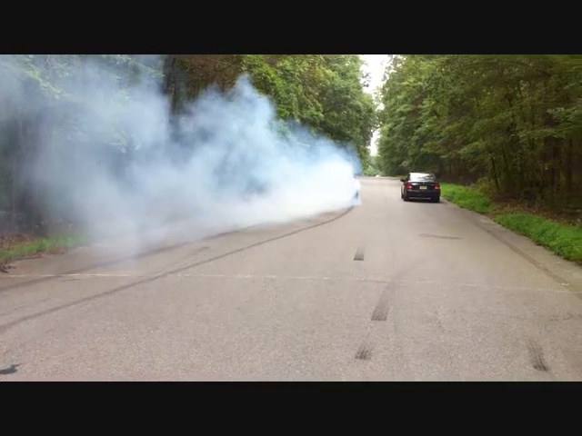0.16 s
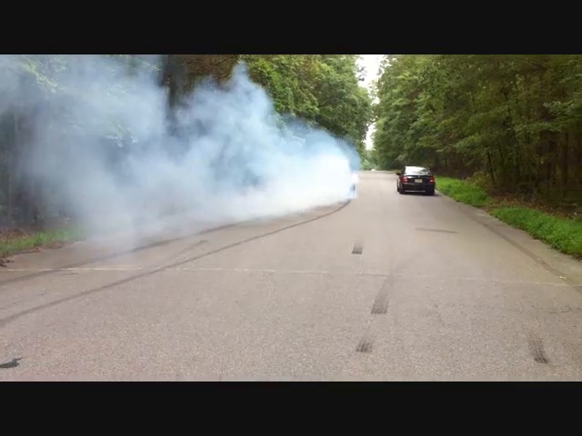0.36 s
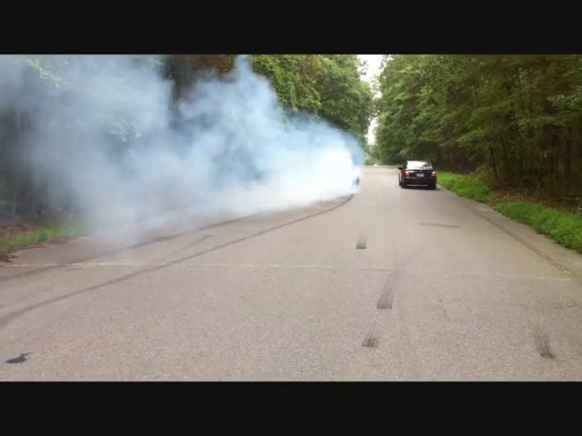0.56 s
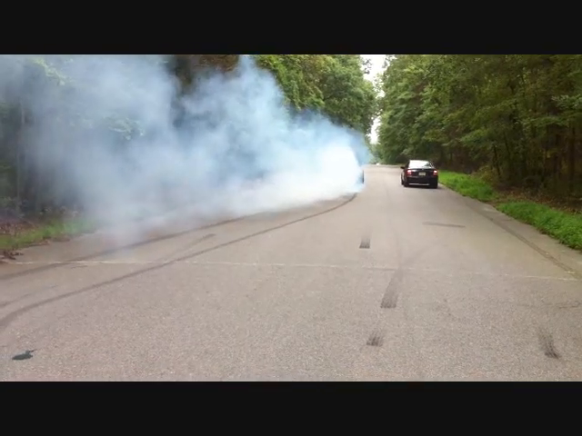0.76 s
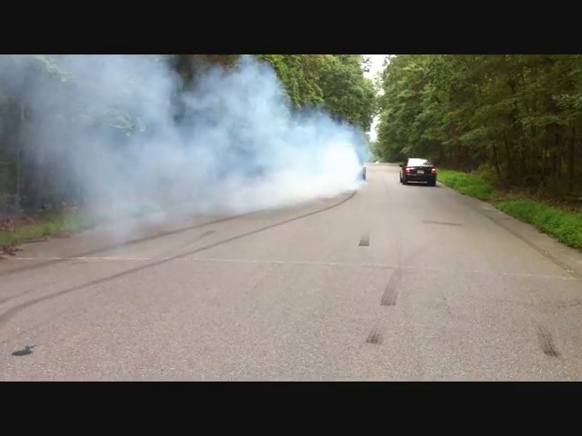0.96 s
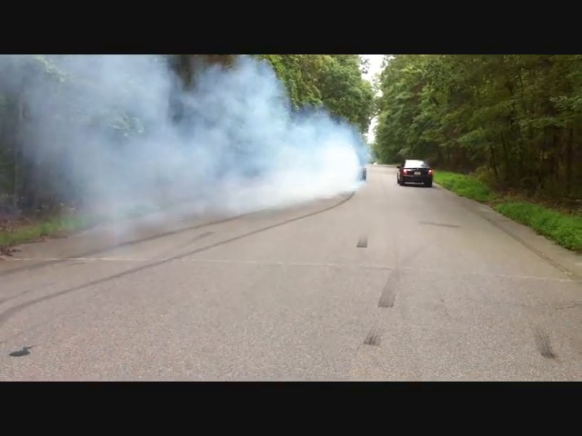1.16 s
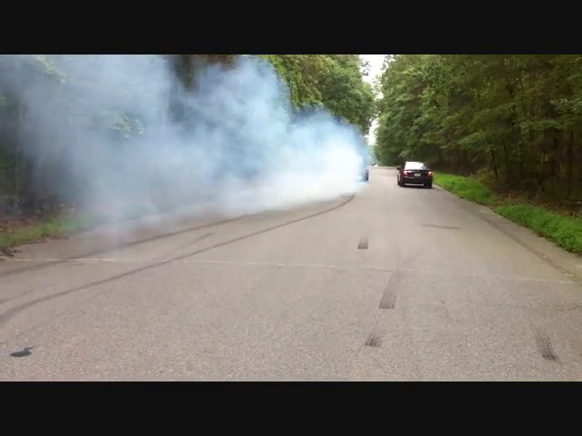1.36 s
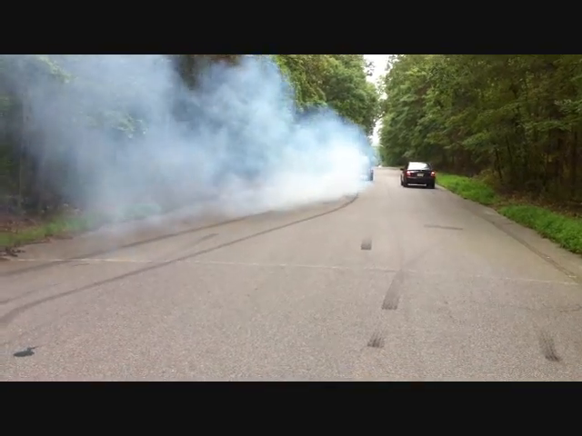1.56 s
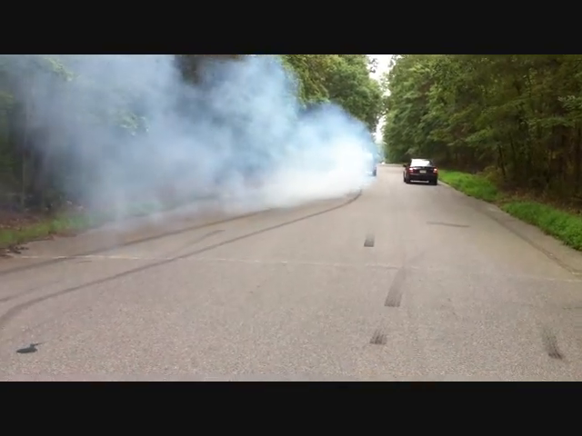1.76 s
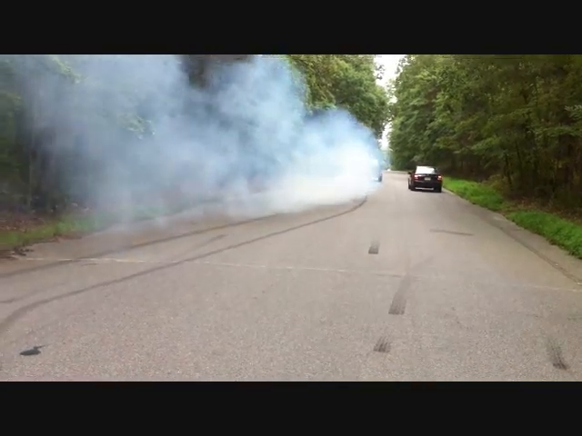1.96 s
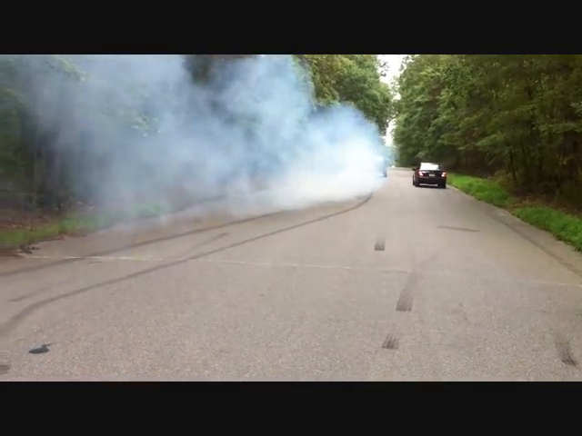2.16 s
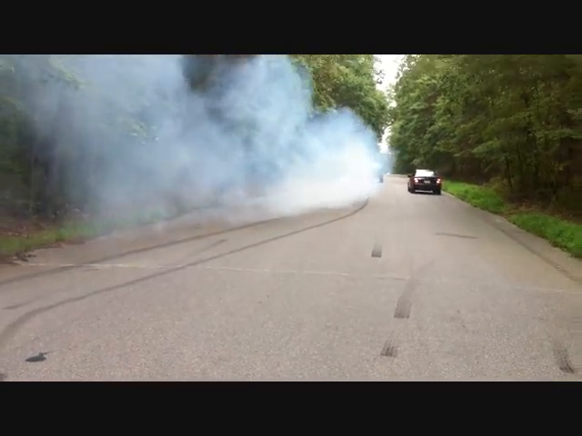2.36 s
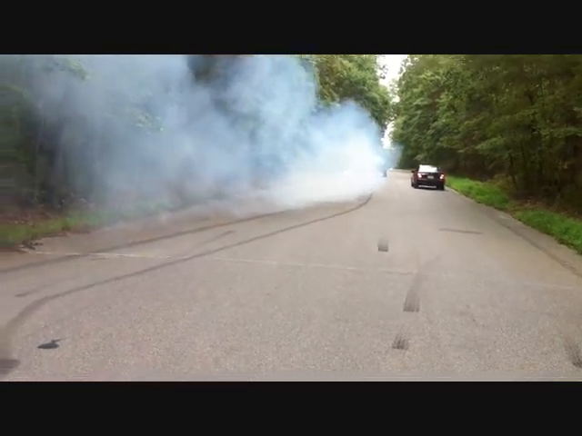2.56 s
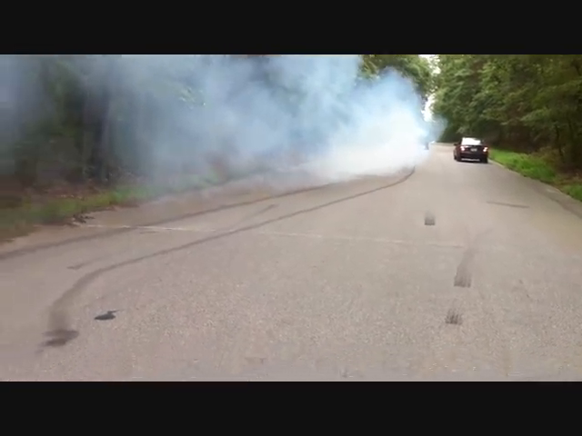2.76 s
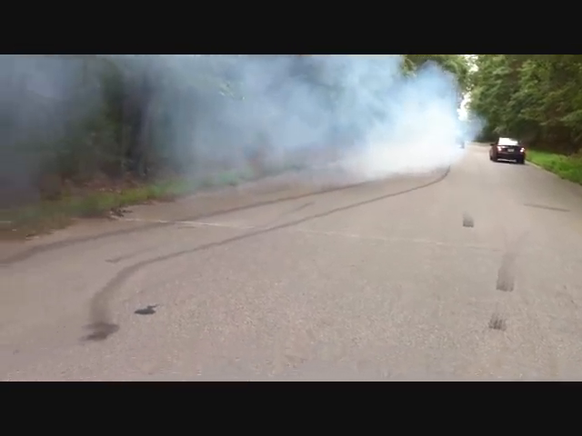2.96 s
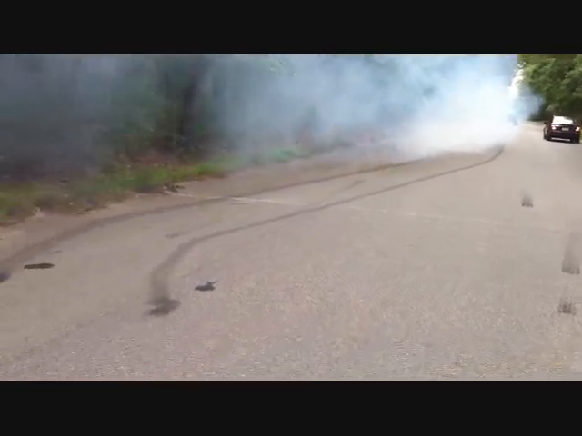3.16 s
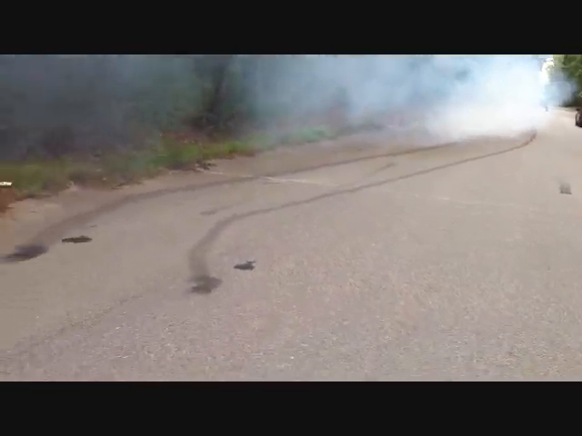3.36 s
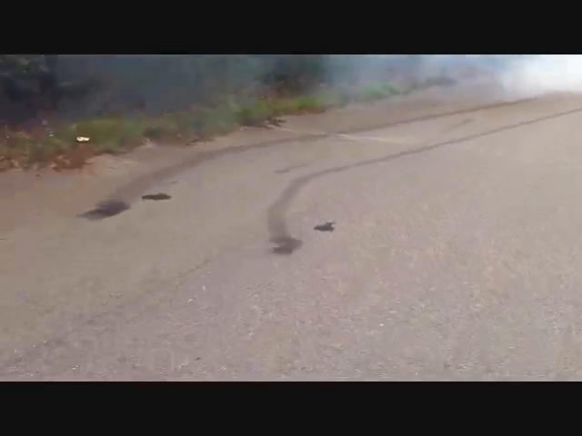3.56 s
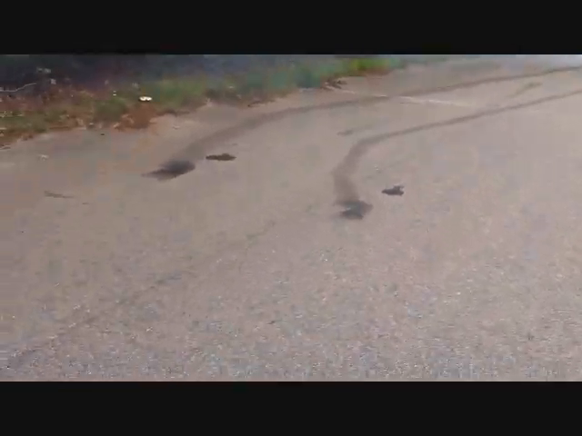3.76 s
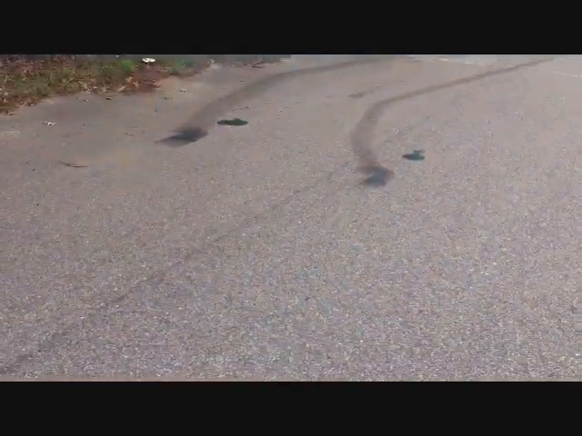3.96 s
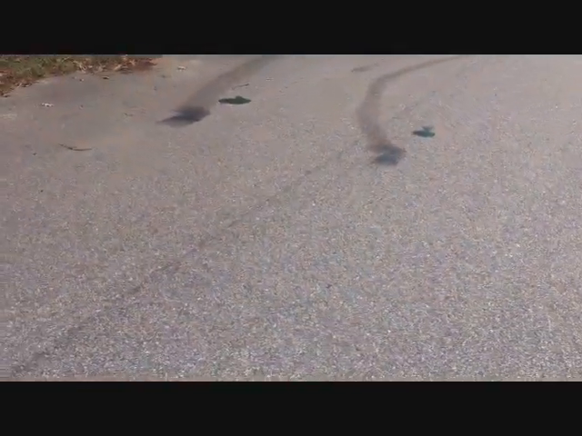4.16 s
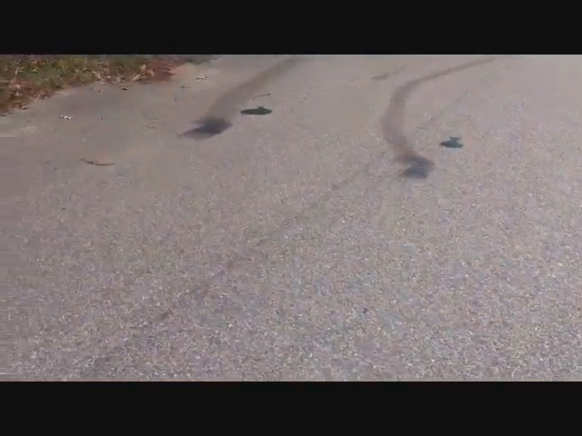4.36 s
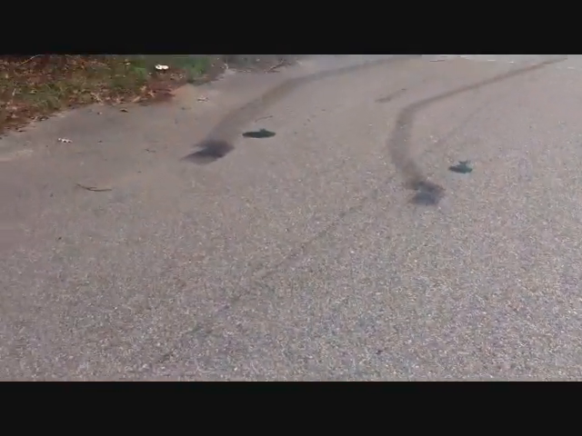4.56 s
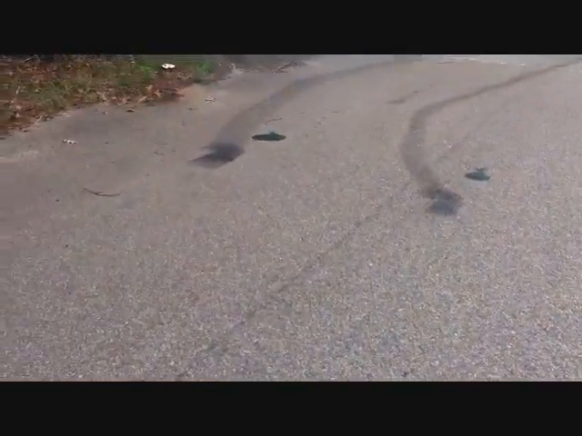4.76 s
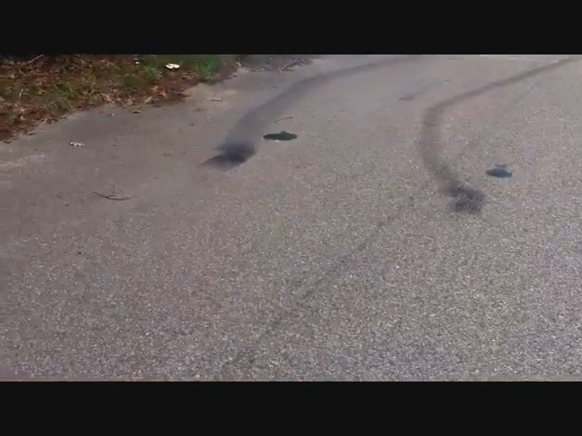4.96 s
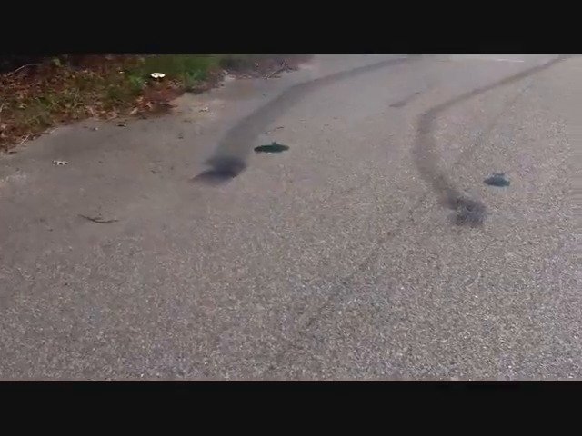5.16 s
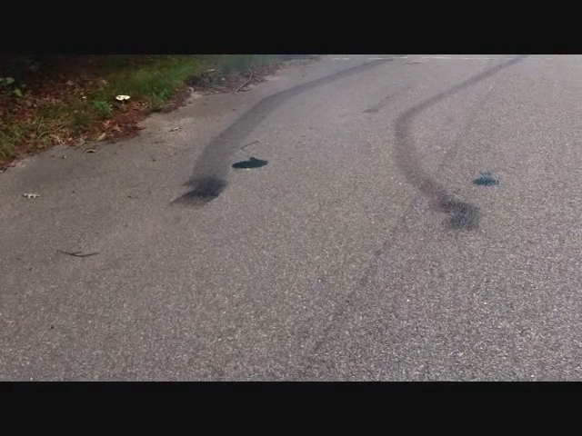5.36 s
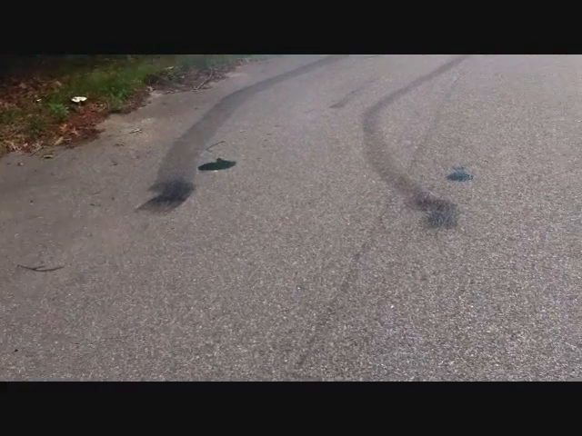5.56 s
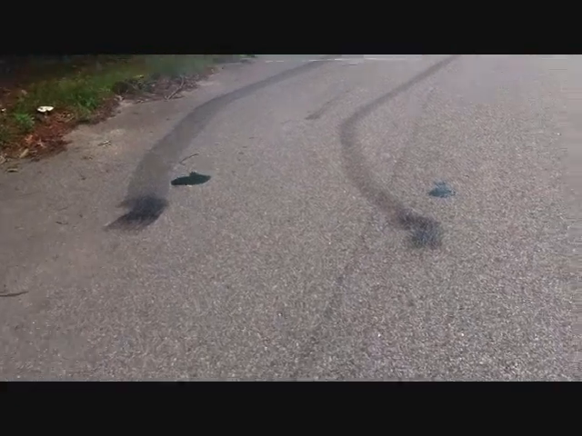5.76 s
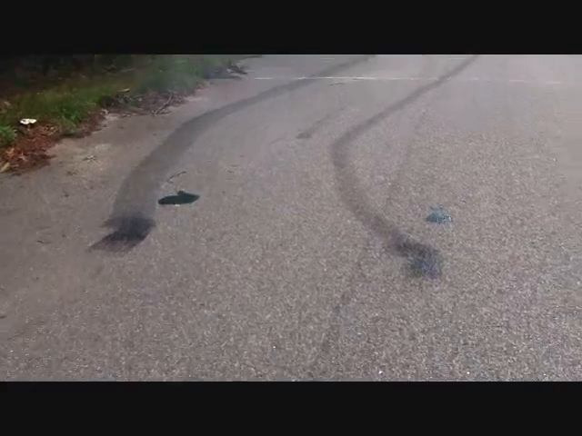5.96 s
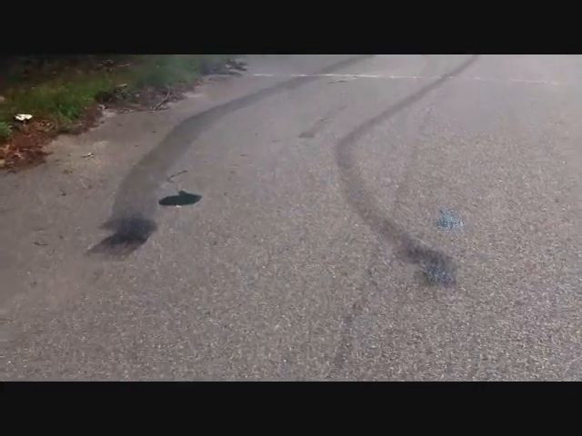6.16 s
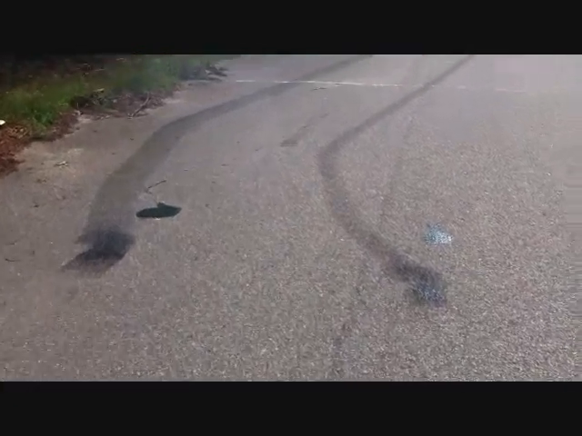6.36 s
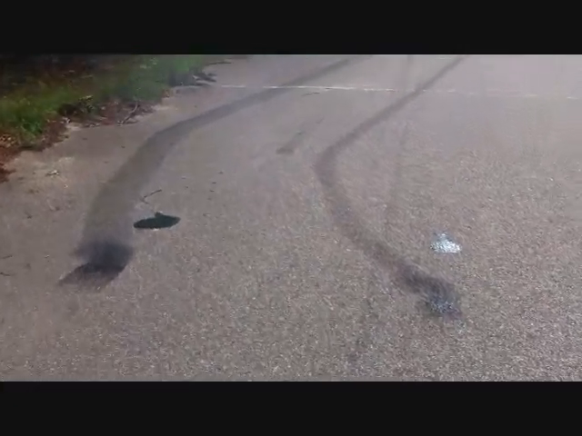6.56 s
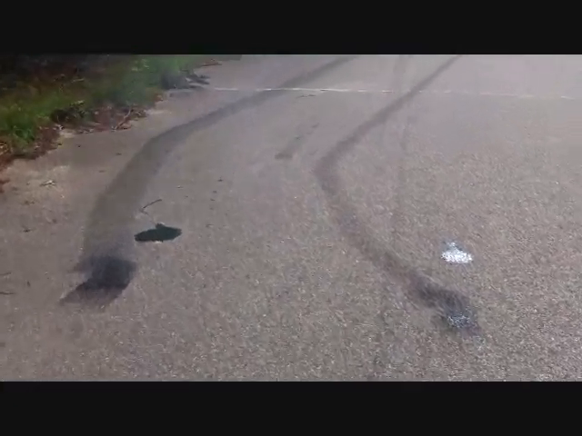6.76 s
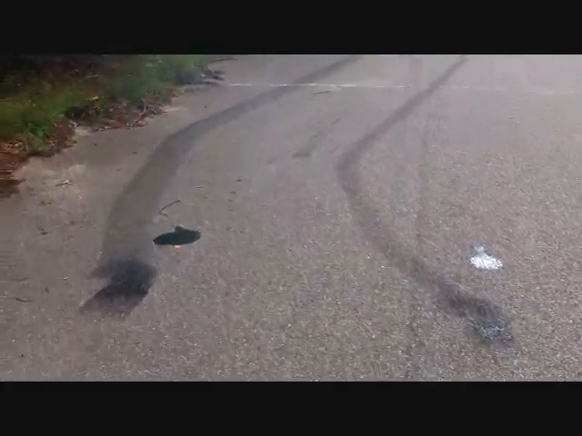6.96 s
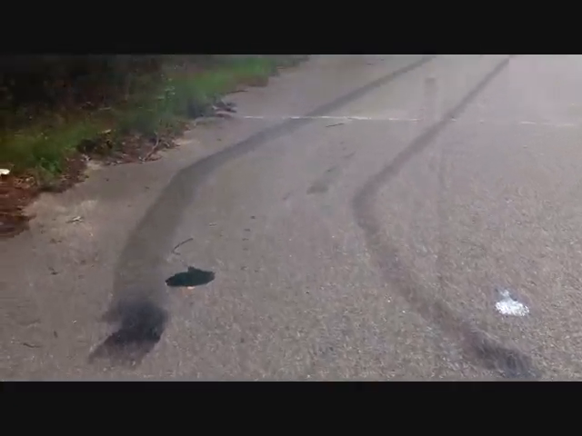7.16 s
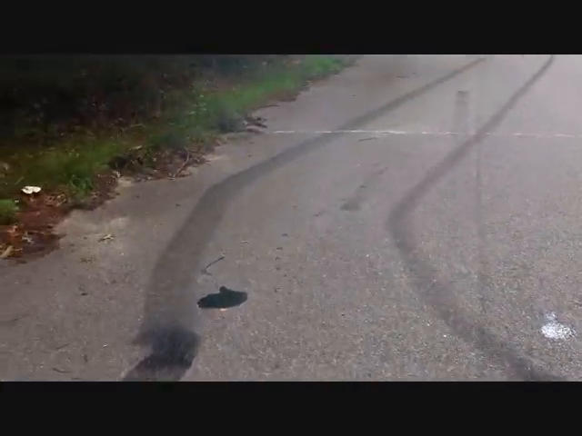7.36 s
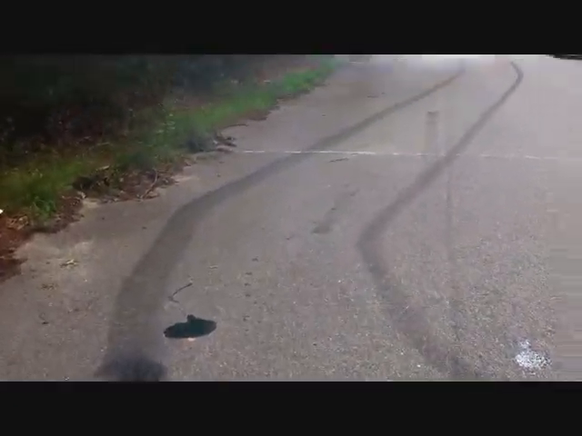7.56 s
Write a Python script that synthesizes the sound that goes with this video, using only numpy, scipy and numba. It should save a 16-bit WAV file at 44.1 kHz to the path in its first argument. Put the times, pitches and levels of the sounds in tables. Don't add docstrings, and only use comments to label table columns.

```python
import sys
import numpy as np
from scipy import signal
from scipy.fft import rfft, irfft, next_fast_len
from scipy.io import wavfile
from scipy.ndimage import uniform_filter1d
from numba import njit

SR = 44100
rng = np.random.default_rng(int(sys.argv[2]) if len(sys.argv) > 2 else 0)


def file_out(sig):
    cols = np.atleast_2d(sig).T
    lim = np.clip(cols, -1, 1)
    pcm = np.round(lim * 32767).astype(np.int16)
    wavfile.write(sys.argv[1], SR, pcm)


def boost(x):
    u = np.asarray(x, float) / 20
    return 10 ** u


N = 339570
T = np.arange(N) / SR

# time in seconds, cycle rate in Hz, effort in dB, lope in dB added to lines under
# the firing rate, bark in dB added to the top lines.
PULL = [
    (0, 40.3, -32, 1, 2),
    (.7, 38.2, -36, 2, 5),
    (1, 36.7, -31, -3, 0),
    (1.4, 34.7, -31, 2.5, -8),
    (1.78, 31.92, -24, -8, -1),
    (2.06, 34.4, -28.5, -5, -4),
    (2.37, 35.05, -29.5, -24, -6),
    (2.63, 36.71, -27.5, -22, 1),
    (2.75, 35.85, -29.5, -14, 1),
]
# time in seconds, level in dB, bark in dB added to the top lines.
COAST = [(2.75, -33, 0), (2.79, -31, 0), (2.82, -27, 3), (2.92, -26, 5), (2.98, -27, 2), (3.04, -27.5, -3),
         (3.15, -27, -5), (3.33, -26.5, -2), (3.6, -28, 0), (3.8, -29, -4), (4.04, -32, -9),
         (4.3, -33, -12), (4.6, -29, -14), (4.9, -26, -16), (5.1, -38, -20)]
# time in seconds, cycle rate in Hz.
COAST_RATE = [(2.75, 36.3), (2.79, 35), (2.83, 33.6), (2.92, 33.4), (3, 31.5), (3.26, 28.2), (3.59, 23.5),
              (3.76, 21.3), (4.21, 16.3), (4.72, 11.7), (5.1, 8.6)]
# multiple of the cycle rate, level in dB.
PULL_LINES = [(3, -7), (4, -8.5), (5, -18), (6, -4.5), (7, -33.5), (8, -10.5), (10, -21), (12, -20),
              (15, -32), (16, -23), (18, -16), (24, -39), (30, -33)]
COAST_LINES = [(5, -17), (6, -1), (7, -24), (9, -13.5), (12, -10.5), (15, -23), (18, -16.5), (24, -26)]
# frequency in Hz, gain in dB.
PULL_PIPE = [(60, -65), (105, -35), (150, 2), (190, -1.5), (240, -9), (345, -9.5), (480, 2.5), (640, 9.5),
             (780, 9.5)]
COAST_PIPE = [(70, -58.5), (105, -17.5), (130, -11), (160, 3), (200, 1.5), (250, -8), (300, -24), (400, -9),
              (560, 3.5), (800, -4)]
# start in seconds, thump in dB, crack in dB, crack centre in Hz.
POPS = [
    (2.549, -60, -29.5, 1500),
    (2.547, -60, -30.5, 407),
    (2.815, -36, -49, 900),
    (2.939, -20.5, -42, 4420),
    (2.945, -60, -32, 650),
    (3.016, -33, -36, 620),
]

# start in seconds, peak in dB, pitch in Hz.
TREAD_SLIPS = [(.003, -5.5, 970), (0.013, -3, 960), (0.053, -2, 925), (.072, -33, 1010), (0.359, -8.5, 910),
               (0.042, -13, 990), (0.09, -9, 970), (0.154, -3.5, 915), (0.193, -3, 1060), (0.225, -15, 1050),
         (0.245, -3, 960), (0.268, -5.5, 940), (0.312, -2, 930), (0.342, -3.5, 950), (0.402, -8, 880),
         (0.427, -8.5, 1040), (0.448, -16, 946), (0.473, -6.5, 880), (0.495, -7, 926), (0.532, -9, 914),
         (0.565, -8, 918), (0.577, -6.5, 930), (0.618, -12, 870), (0.642, -9, 830), (0.659, -6, 940),
         (0.684, -11.5, 945), (0.709, -13, 947), (0.729, -11, 953), (0.767, -9, 880), (0.786, -11, 900),
         (0.845, -10.5, 934), (0.877, -13.5, 986), (0.897, -27, 937), (0.938, -12.5, 824),
         (0.996, -19, 951), (1.02, -10, 800), (1.039, -15, 900), (1.086, -15, 1030), (1.108, -21, 920),
         (1.139, -28, 810), (1.184, -24, 982), (1.206, -21, 810), (1.243, -25, 950), (1.326, -23, 991),
         (1.342, -24, 905)]
# time in seconds, main pitch in Hz, upper pitch in Hz.
ROWS = [(0, 947.2, 1026), (.2, 942.4, 1075), (.35, 934, 1076), (.5, 917, 1044), (.6, 933.7, 1044),
        (.7, 960.4, 1034), (.85, 922, 1045), (1, 936, 1013), (1.1, 930, 1004), (1.5, 920, 980)]
# peak time in seconds, peak in dB, pitch in Hz.
SHRIEKS = [(0.0149, -19, 1836), (0.0572, -8.5, 1818), (0.1221, -17, 1610), (0.1544, -18, 1850),
           (0.2099, -18, 1850), (0.2674, -17, 1880), (0.314, -14, 1810), (0.3721, -20, 1840),
           (0.4773, -29, 1900), (0.5094, -16, 1880), (0.5894, -18, 1830), (0.6744, -20, 1850)]
# time in seconds, level in dB.
SPIN = [
    (0, -33),
    (1.07, -35),
    (2.17, -39),
    (2.62, -44),
    (2.76, -51),
    (3.42, -58),
    (4.4, -63),
]
# frequency in Hz, density in dB per Hz.
HISS = [(1650, -5.5), (2800, -5), (5180, -2), (6200, 0.5), (7410, -3.5), (8680, -4), (11600, -12),
        (13700, -21), (15500, -26)]

# time in seconds, level in dB.
ROLL = [(0, -20.5), (.12, -23), (.4, -22), (.9, -25.5), (1.5, -30), (1.9, -31.5), (2.5, -30), (2.8, -32.5),
        (2.95, -32.5), (3.1, -34.5), (3.5, -37.5), (4, -38.5), (4.5, -42), (5.1, -42), (5.6, -46),
        (6, -49.5), (7, -54.5), (7.7, -56)]
# frequency in Hz, density in dB per Hz.
ROAR = [(30, -55), (60, -34.5), (120, -14), (190, -6.5), (420, -13.5), (670, -3.5), (790, -10),
        (1030, -7.5), (1370, -14), (1560, -12), (2050, -14), (2450, -16.5), (2750, -22), (4200, -25),
        (8000, -45)]
# time in seconds, gain in dB.
UPPER_MIDDLE = [(0, 0.5), (3.6, 1), (4.2, -3), (4.8, -2.5), (5.2, 0), (6.4, 2.5), (7.7, 5.5)]

# time in seconds, effort in dB, lope in dB, bark in dB, extra of the firing line in dB.
OTHER = [(4.6, -58, 9, -6, -3), (4.9, -53.5, 1, -7, -3), (5.1, -57, 0.5, -8, -2), (5.3, -52, 2, -5, -8),
         (5.5, -49.5, -1, -11, -4), (5.79, -52.5, 0, -6, 2), (5.97, -51.5, -3, -7, -9),
         (6.17, -53, 3, -4, 2.5), (6.57, -52, 1, -7, -3.5), (6.89, -54, 5.5, -3, 5),
         (7.1, -53.5, 1.5, 2.5, 6), (7.35, -60, 2, 2, 13), (7.7, -70, 3, -2, 14)]
# time in seconds, cycle rate in Hz.
OTHER_RATE = [(4.6, 45.5), (4.9, 47.5), (5.08, 46.5), (5.3, 49.6), (5.5, 50.4), (5.68, 46.9), (5.8, 45.4),
              (5.97, 49.5), (6.17, 54.5), (6.58, 56.1), (6.87, 55.7), (7.06, 51), (7.32, 47.7), (7.7, 46.5)]
# multiple of the cycle rate, level in dB.
OTHER_LINES = [(2, -3), (3, -3.5), (4, -2), (5, 0.5), (6, 1), (7, -0.5), (8, 1.5), (9, -1), (10, -11),
               (11, -2), (12, -2.5)]
# frequency in Hz, gain in dB.
OTHER_PIPE = [(80, -23), (140, 0.5), (240, -2), (330, 2), (380, -16), (490, -1), (570, 5), (640, -17),
              (700, -22)]

# start in seconds, length in seconds, pitch in Hz, level in dB.
WHISTLES = [(4.006, 0.068, 5900, -54), (4.097, 0.1, 5920, -63), (4.08, 0.11, 7370, -55),
            (4.19, 0.088, 6840, -58), (5.478, .049, 5900, -57), (5.65, 0.26, 6986, -65),
            (6.38, .1, 6900, -62), (7.401, 0.031, 6200, -57), (7.438, 0.065, 6230, -61),
            (7.49, .1, 6200, -65), (7.65, .05, 6900, -68)]
# start in seconds, start pitch in Hz, end pitch in Hz, level in dB.
CHIPS = [(3.995, 6900, 6000, -53), (4.03, 5900, 4900, -60), (7.312, 5000, 6700, -66),
         (7.332, 6700, 5200, -68), (7.412, 5100, 5660, -61), (7.424, 5100, 5900, -61),
         (7.51, 5200, 5490, -63), (7.589, 5100, 5600, -63), (7.62, 5600, 7000, -68),
         (7.667, 5100, 5440, -64), (7.68, 5100, 5740, -63)]
# peak time in seconds, level in dB.
CICADA_SWELLS = [(3.0, -62), (3.5, -62), (4.0, -62.5), (4.6, -64.5), (5.15, -61), (5.6, -68), (6.3, -66),
                 (6.8, -67)]
# start in seconds, level in dB, centre in
# Hz.
TICKS = [
    (4.862, -54, 14000),
    (5.6, -53, 380),
    (6.799, -44, 600),
    (7.2, -50, 1104),
    (7.238, -45, 600),
    (7.275, -57, 2600),
    (7.29, -56, 11000),
    (7.32, -47, 800),
    (7.335, -59, 2800),
    (7.572, -45, 500),
]
# frequency in Hz, density in dB per Hz.
STILL_AIR = [(15, -56), (25, -27), (55, -33), (234, -3), (411, -12), (568, -5), (744, -22), (2180, -24),
             (2710, -26), (4650, -29), (8390, -26.5), (10000, -30), (15600, -35.5)]


def level(x, db):
    return x * boost(db) / np.sqrt(np.mean(x ** 2))


def curves(table):
    s, *columns = np.transpose(table)
    gate = np.interp(T, [s[0] - .04, s[0], s[-1], s[-1] + .04], [0, 1, 1, 0])
    return [np.interp(T, s, column) for column in columns], gate


def walk(rate_hz):
    hold = int(SR / rate_hz)
    steps = np.repeat(rng.standard_normal(N // hold + 1), hold)
    return 1.3 * uniform_filter1d(uniform_filter1d(steps, hold), hold)[:N]


@njit
def svf(x, hz, width_hz):
    y, band, low = np.empty(len(x)), 0., 0.
    for i in range(len(x)):
        g, k = np.tan(np.pi * hz[i] / SR), width_hz / hz[i]
        v = (band + g * (x[i] - low)) / (1 + g * (g + k))
        band, low, y[i] = 2 * v - band, low + 2 * g * v, k * v
    return y


def ring(x, hz, width_hz):
    hz = hz + np.zeros(len(x))
    return svf(svf(x, hz, 1. * width_hz), hz, 1. * width_hz)


def ringing_noise(hz, width_hz, db):
    return level(ring(rng.standard_normal(N), hz, width_hz), db)


def airy(spectrum, flicker_db, rate_hz, band_db=lambda hz: 0):
    size = next_fast_len(N)
    octave = np.log2(np.maximum(np.arange(size // 2 + 1) * SR / size, 1))
    hz, db = np.transpose(spectrum)
    colour_db = np.interp(octave, np.log2(hz), db, left=-150, right=-150)
    noise = rfft(level(rng.standard_normal(size), 0)) * boost(colour_db)
    noise = noise / np.std(irfft(noise, size))
    out = 0
    for centre in np.arange(np.log2(hz[0]), np.log2(hz[-1]) + .5, .5):
        share = np.cos(np.pi * np.clip(octave - centre, -.5, .5)) ** 2
        gain_db = band_db(2 ** centre) + flicker_db * walk(rate_hz)
        out = out + irfft(noise * share, size)[:N] * boost(gain_db)
    return out


def scatter_back(x, tail):
    return signal.fftconvolve(x, tail / np.sqrt(np.sum(tail ** 2)))[:N]


def exhaust(turns, hz, level_db, lines, pipe, flutter_db, spread, lope_db=0, bark_db=0, firings=6, firing_db=0):
    start = spread * rng.random(40)
    pipe_hz, pipe_db = np.transpose(pipe)
    out = 0
    for k, db in lines:
        gain_db = level_db + db + np.interp(np.log(k * hz), np.log(pipe_hz), pipe_db) + flutter_db * walk(9.9)
        if k < firings:
            gain_db = gain_db + lope_db
        if k == firings:
            gain_db = gain_db + firing_db
        if k > 2 * firings:
            gain_db = gain_db + bark_db + 1.5 * walk(35)
        out = out + np.sqrt(2) * boost(gain_db) * np.sin(2 * np.pi * (k * turns + start[k]))
    return out


def backfires(note):
    thump_hz, rise_s, swallow_db, swallow_s = 154, 0.02, -24, 0.0082
    pops, noise = 0, rng.standard_normal(N)
    for s, thump_db, crack_db, crack_hz in POPS:
        age = np.maximum(T - s, 0)
        swallowed = np.clip(boost(thump_db - swallow_db), 0, 1)
        note = note * (1 - swallowed * np.exp(-((T - s - rise_s) / swallow_s) ** 2))
        swing_up = (age / rise_s * np.exp(1 - age / rise_s)) ** 3
        thump = boost(thump_db) * swing_up * np.sin(2 * np.pi * thump_hz * age)
        burst = level(ring(noise, crack_hz, 400 + 0.39 * crack_hz), crack_db)
        crack = burst * np.e * age / 0.0034 * np.exp(-age / 0.0038)
        pops = pops + thump + crack
    return note + pops


def car():
    (pull_hz, pull_db, lope_db, bark_db), _ = curves(PULL)
    (coast_db, coast_bark_db), coasting = curves(COAST)
    (coast_hz,), _ = curves(COAST_RATE)
    lift_s = COAST[0][0]
    throttle = np.clip((lift_s - T) / .04, 0, 1)
    cycle_hz = np.where(T < lift_s, pull_hz, coast_hz)
    turns = np.cumsum(cycle_hz * (1 + 0.001 * walk(24))) / SR
    pull = exhaust(turns, pull_hz, pull_db, PULL_LINES, PULL_PIPE, flutter_db=0.6, spread=0,
                   lope_db=lope_db, bark_db=bark_db)
    coast = exhaust(turns, coast_hz, coast_db, COAST_LINES, COAST_PIPE, flutter_db=.7, spread=0,
                    bark_db=coast_bark_db)
    note = backfires(pull * throttle + coast * coasting)
    rasp_db, rasp_db_per_octave = -14, 14
    rasp_db = coast_db + rasp_db + rasp_db_per_octave * np.log2(coast_hz / COAST_RATE[0][1])
    return note + ringing_noise(1463, 140, 1.9) * boost(rasp_db) * coasting


def squeal():
    hz, squeal_db = 955 - 25 * T, -14 - 7.5 * T
    slip_s, lag_s, slip_db, detune = 0.0039, 0.0027, -4.5, .55
    (row_hz, upper_hz), _ = curves(ROWS)
    turns = np.cumsum(row_hz * (1 + .012 * walk(120))) / SR
    bursts, slips = 0, 0
    for s, db, slip_hz in TREAD_SLIPS:
        age = T - s - lag_s
        burst = boost(db + slip_db) * np.exp(-(age / slip_s) ** 2)
        bursts = bursts + burst
        slips = slips + burst * np.sin(2 * np.pi * (turns + detune * (slip_hz - row_hz) * age))
    tread = boost(-8 + 1.8 * walk(70)) * np.sqrt(2) * np.sin(2 * np.pi * turns)
    blocks = ringing_noise(hz * 0.985, 320, -3.2) / (1 + 1.1 * bursts / boost(squeal_db))
    swing = tread + blocks + ringing_noise(upper_hz, 69, -13.5)
    lower = ringing_noise(679, 130, -12)
    octave = level(ring((swing + slips / boost(squeal_db)) ** 2, 2 * hz, 240), -27.5)
    spinning = np.interp(T, [1.08, 1.16, 1.5], [1, .6, 0])
    return slips + boost(squeal_db) * spinning * (swing + lower + octave)


def shrieks():
    length_s, gain_db = 0.0042, -6
    out = 0
    for s, db, hz in SHRIEKS:
        out = out + boost(db + gain_db) * np.exp(-((T - s) / length_s) ** 2) * np.sin(2 * np.pi * hz * T)
    return out


def torn_rubber():
    (hiss_db,), _ = curves(SPIN)
    top_db = 12.5 - 1 * T
    hiss = airy(HISS, flicker_db=0.5, rate_hz=14, band_db=lambda hz: top_db * np.clip(np.log2(hz / 7500), 0, 1))
    grooves = ringing_noise(2380, 290, -10.0)
    return boost(hiss_db + 1.0) * (hiss + grooves) * np.interp(T, [3.3, 4.4], [1, 0])


def roar():
    (db,), _ = curves(ROLL)
    (upper_middle_db,), _ = curves(UPPER_MIDDLE)
    faded_db = -23.0 - db
    tilt_db_per_octave = 0.14 + 0.034 * faded_db
    rumble_db, top_db = -9 + 0.65 * faded_db, -2.17 - 0.2 * faded_db

    def colour_db(hz):
        tilt_db = tilt_db_per_octave * max(np.log2(hz / 750), 0)
        return tilt_db + rumble_db * (70 < hz < 420) + top_db * (hz > 1900) + upper_middle_db * (1600 < hz < 3000)

    return boost(db) * airy(ROAR, flicker_db=0.98, rate_hz=14, band_db=colour_db)


def other_car():
    (db, lope_db, bark_db, firing_db), gate = curves(OTHER)
    (hz,), _ = curves(OTHER_RATE)
    turns = np.cumsum(hz * (1 + 0.0019 * walk(24.86))) / SR
    puffs = np.exp(-(turns % 1) / .2) * boost(1.5 * walk(40)) * rng.standard_normal(N)
    gas = level(ring(puffs, 550, 130), -3.0) + level(ring(puffs, 810, 500), -11)
    gas = gas + level(ring(puffs, 2230, 380), -17.0)
    note = exhaust(turns, hz, db, OTHER_LINES, OTHER_PIPE, flutter_db=.8, spread=.15, lope_db=lope_db,
                   bark_db=bark_db, firings=5, firing_db=firing_db)
    note = note - .75 * svf(note, np.full(N, 410.), 110.)
    return (note + boost(db + lope_db) * gas) * gate


def trees(engines):
    t60_s, return_db = 0.72, -19
    age = T[:SR]
    trunks = rng.standard_normal(SR) * boost(-60 * age / t60_s) * (age > .03)
    return boost(return_db) * scatter_back(engines, trunks)


def birds():
    chip_s, leaves_t60_s, leaves_db = 0.0226, .22, -5
    warble, flutter = 1 + .014 * walk(300), boost(2.5 * walk(160) - 1.5)
    notes = [(s, length_s, hz, hz, db) for s, length_s, hz, db in WHISTLES]
    notes = notes + [(s, chip_s, start_hz, end_hz, db) for s, start_hz, end_hz, db in CHIPS]
    song = 0
    for s, length_s, start_hz, end_hz, db in notes:
        part = np.clip((T - s) / length_s, 0, 1)
        glide = np.cumsum((start_hz + (end_hz - start_hz) * part) * warble) / SR
        swell = np.sqrt(2 * np.abs(np.sin(np.pi * part)))
        song = song + flutter * boost(db - 3.0) * swell * np.sin(2 * np.pi * glide)
    leaves = rng.standard_normal(SR // 2) * boost(-60 * T[:SR // 2] / leaves_t60_s)
    return song + boost(leaves_db) * scatter_back(song, leaves)


def insects():
    crickets = ringing_noise(8300, 620, -66.5) * boost(1.5 * walk(90))
    swell, swell_s = boost(-72), 0.26
    for s, db in CICADA_SWELLS:
        swell = swell + boost(db) * np.exp(-((T - s) / swell_s) ** 2)
    cicadas = ringing_noise(5950, 1150, -2.0) * swell * boost(1.8 * walk(50) + 1.2 * walk(18))
    return crickets + cicadas


def ticks():
    rise_s, fade_s = .002, .005
    out, noise = 0, rng.standard_normal(N)
    for s, db, hz in TICKS:
        burst = level(ring(noise, hz, 300 + 0.37 * hz), db)
        out = out + burst * np.clip((T - s) / rise_s, 0, 1) ** 2 * np.exp(-np.maximum(T - s, 0) / fade_s)
    return out


def still_air():
    return boost(-53.5) * airy(STILL_AIR, flicker_db=.7, rate_hz=8)


def scene():
    engines = car() + other_car()
    tyres = squeal() + shrieks() + torn_rubber()
    woods = birds() + insects() + ticks() + still_air()
    return (engines + trees(engines) + tyres + roar() + woods)[None]


def band_limit(x):
    return signal.sosfilt(signal.butter(12, 15720, fs=SR, output="sos"), x)


def record(dry):
    mask_hz, mask_ratio_db, duck_db = 12300, 39, -14
    thin = signal.sosfilt(signal.butter(2, 40, "high", fs=SR, output="sos"), dry)
    top = signal.sosfiltfilt(signal.butter(4, mask_hz, "high", fs=SR, output="sos"), thin)
    power, top_power = uniform_filter1d(thin ** 2, size=8192), uniform_filter1d(top ** 2 + 1e-12, size=8192)
    ratio_db = 10 * np.log10(power / top_power)
    duck = boost(duck_db * np.clip((ratio_db - mask_ratio_db) / 4, 0, 1))
    mix = thin - top * (1 - duck)
    return band_limit(mix)


dry = scene()
out = record(dry)
file_out(out)
```